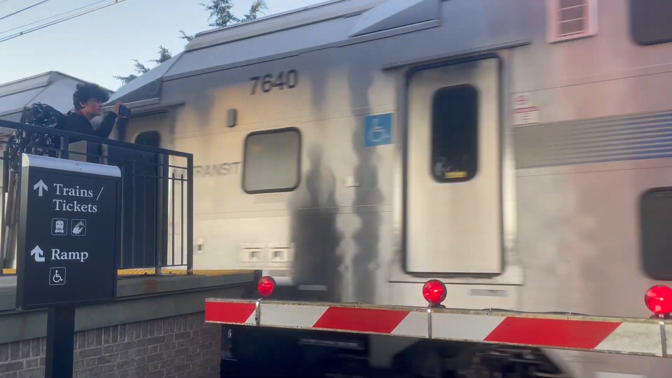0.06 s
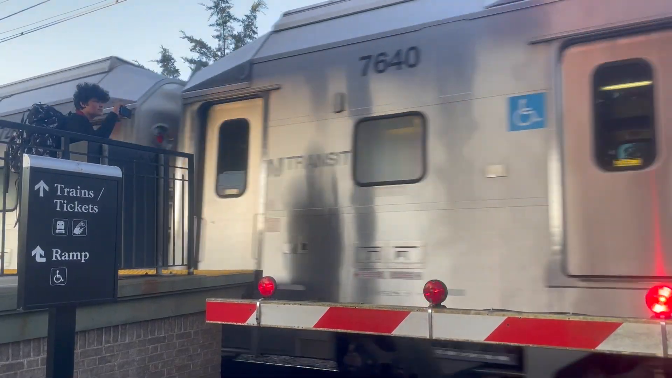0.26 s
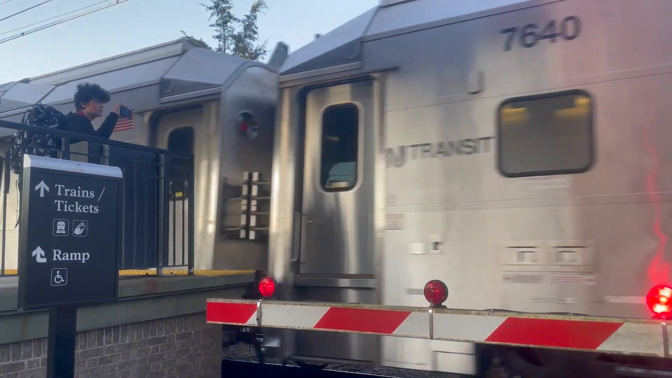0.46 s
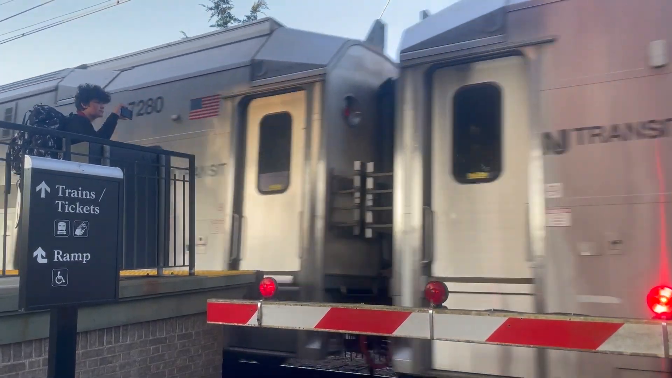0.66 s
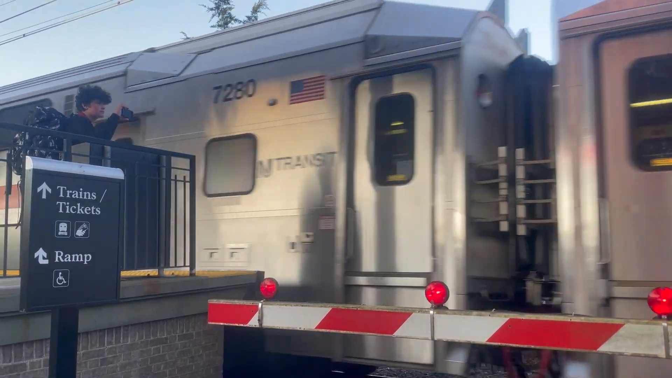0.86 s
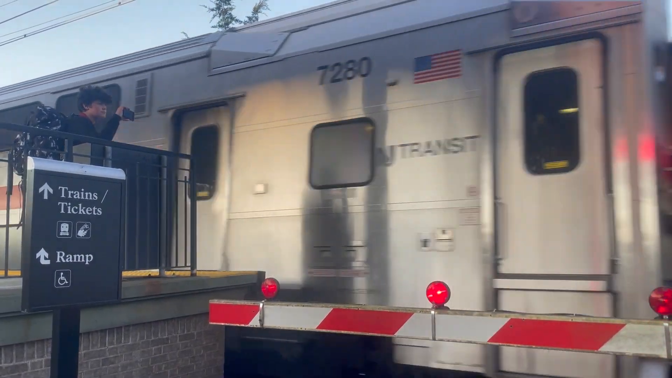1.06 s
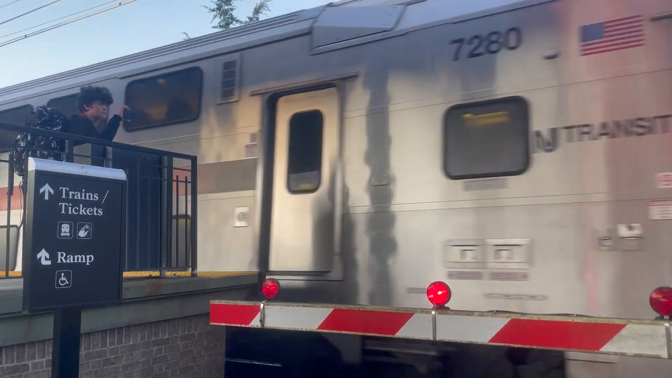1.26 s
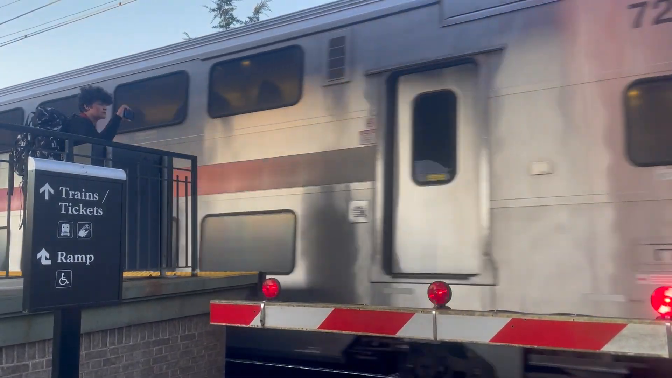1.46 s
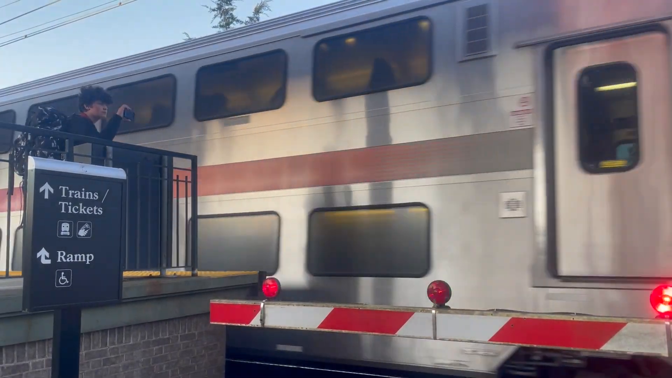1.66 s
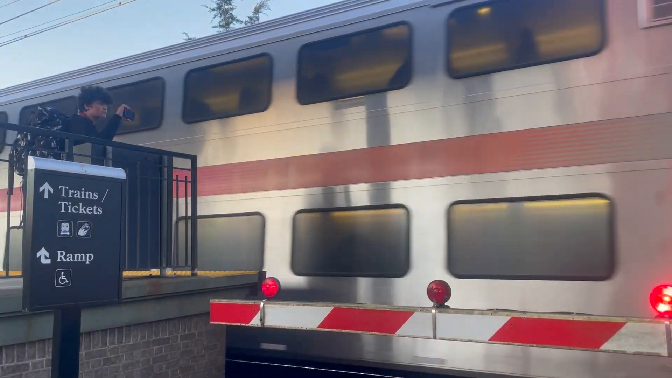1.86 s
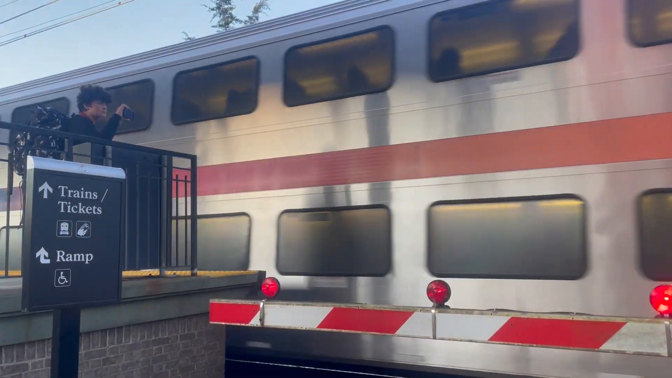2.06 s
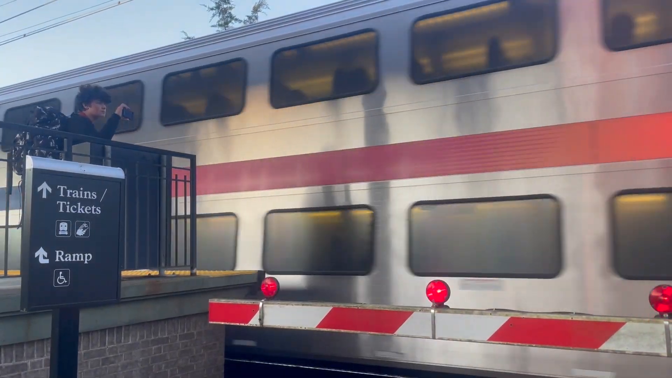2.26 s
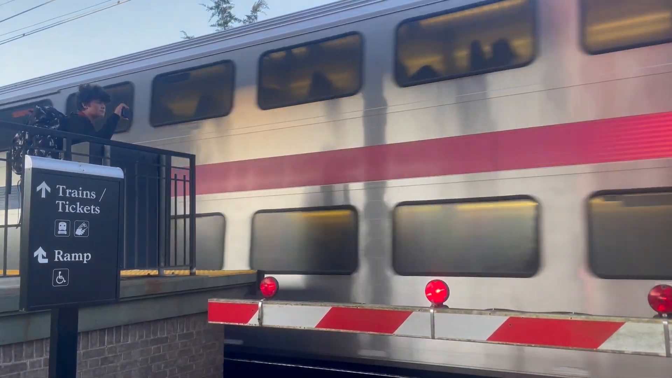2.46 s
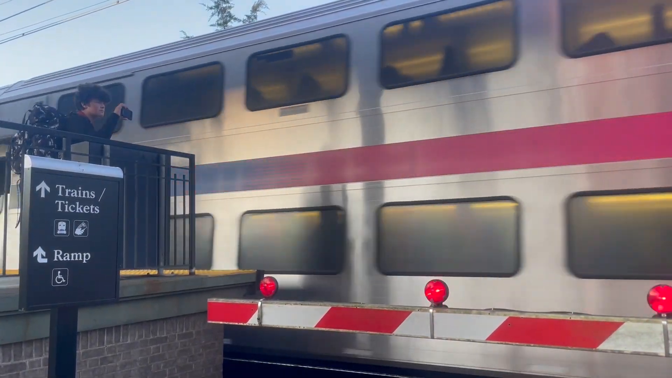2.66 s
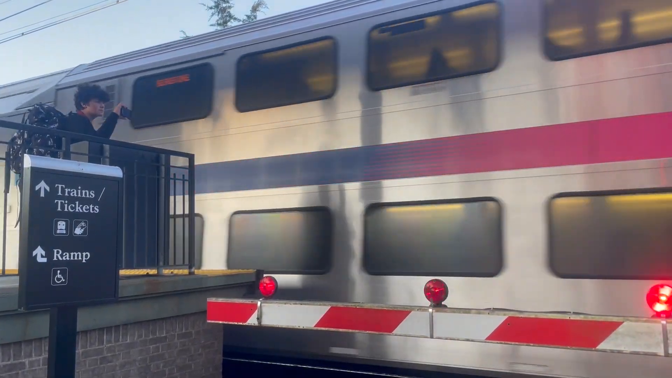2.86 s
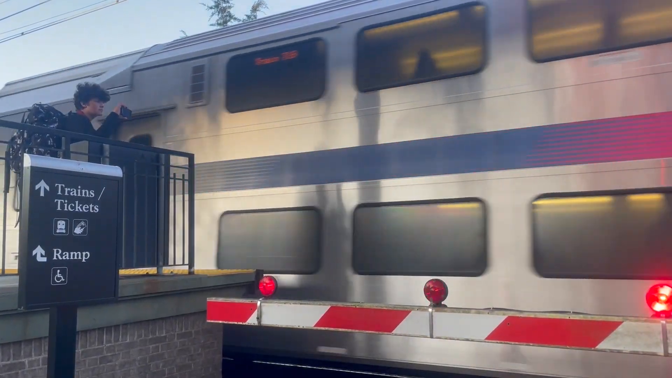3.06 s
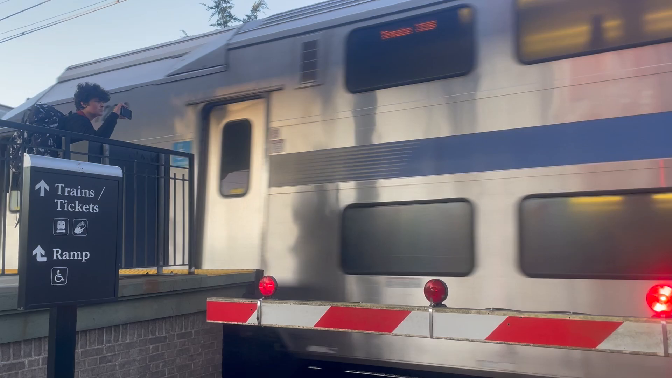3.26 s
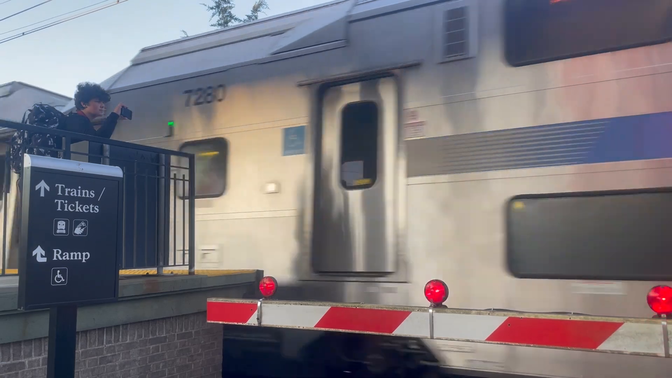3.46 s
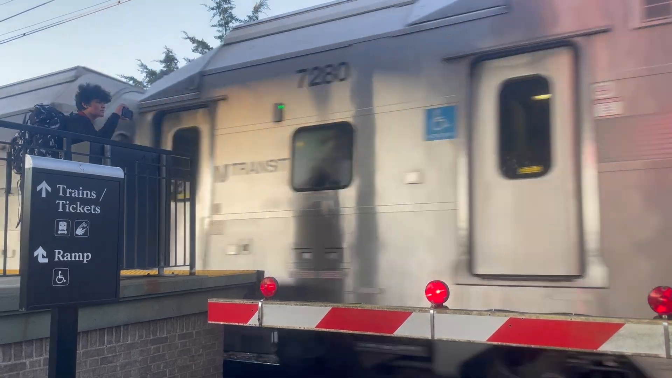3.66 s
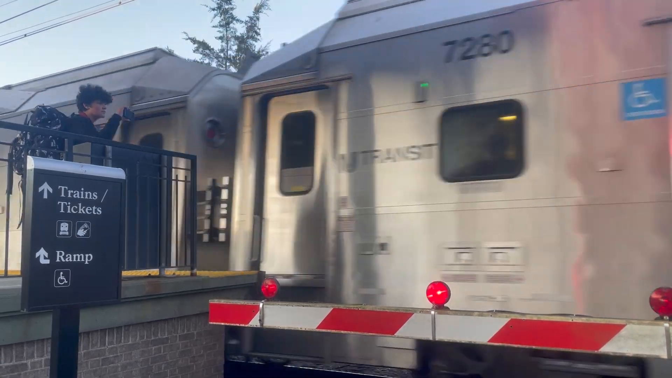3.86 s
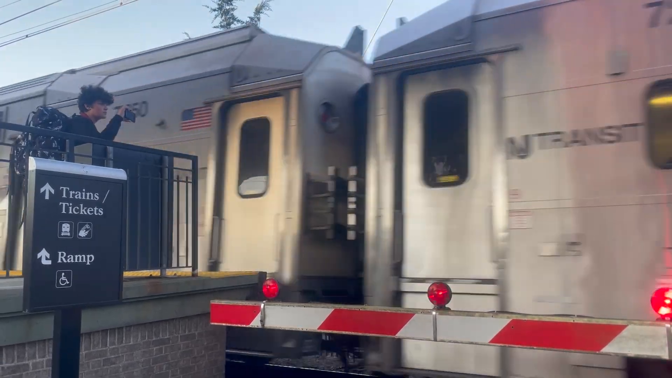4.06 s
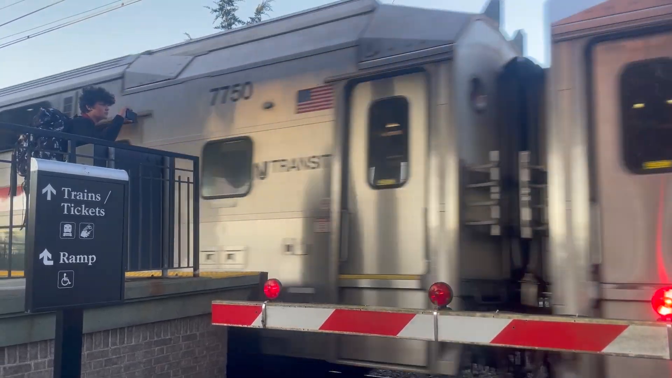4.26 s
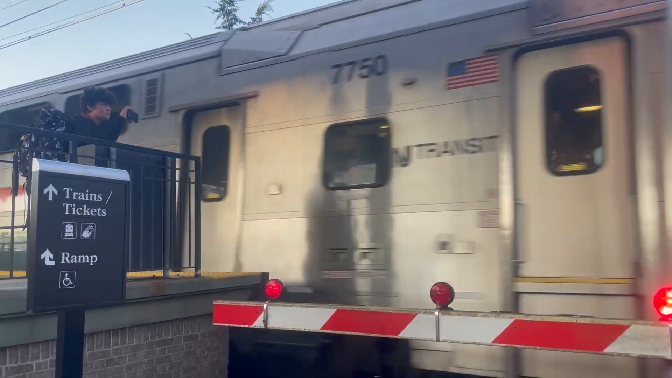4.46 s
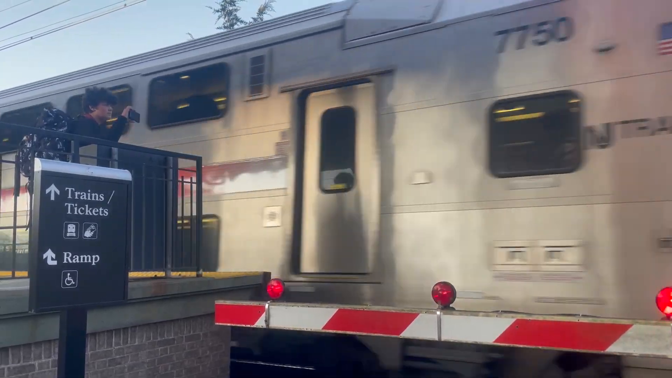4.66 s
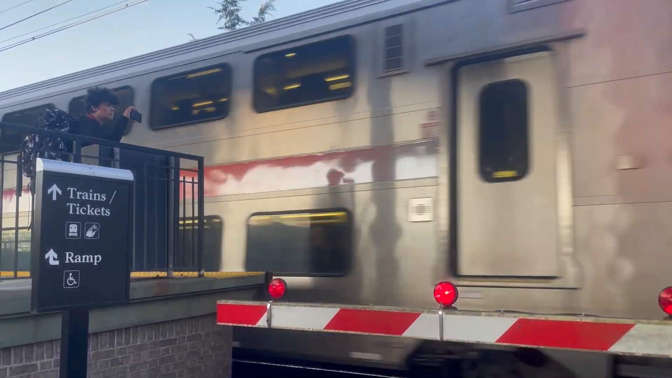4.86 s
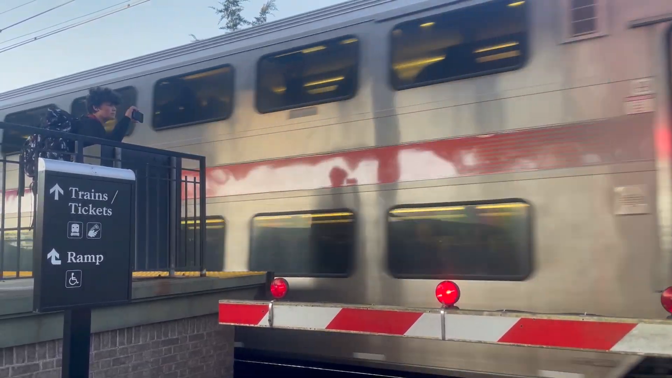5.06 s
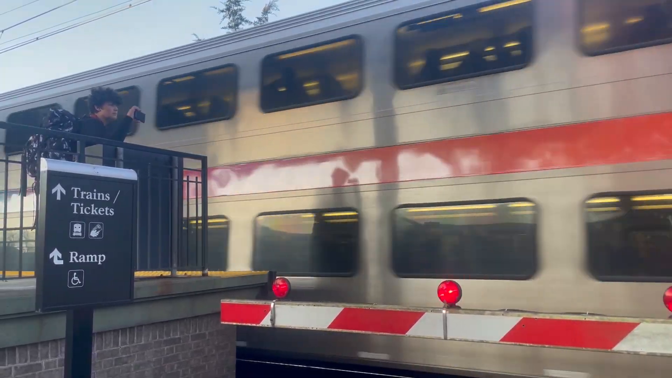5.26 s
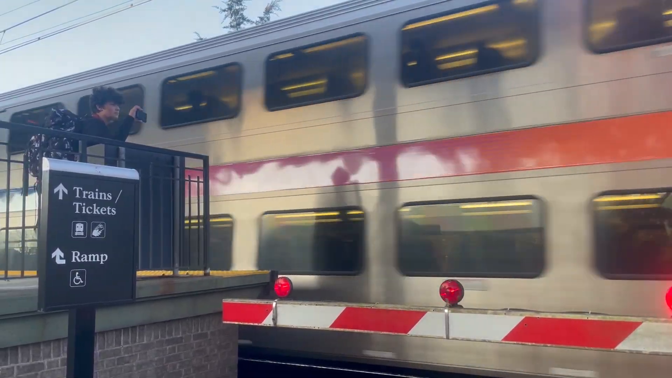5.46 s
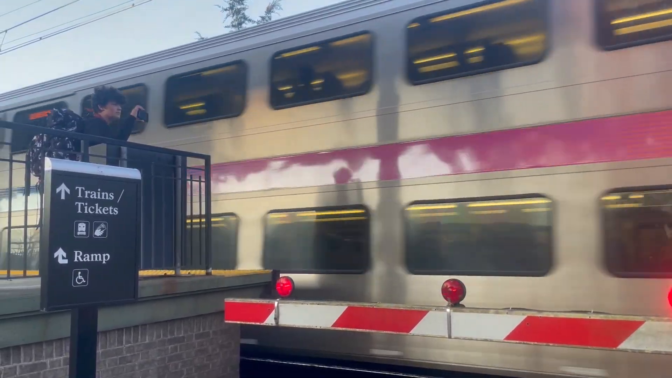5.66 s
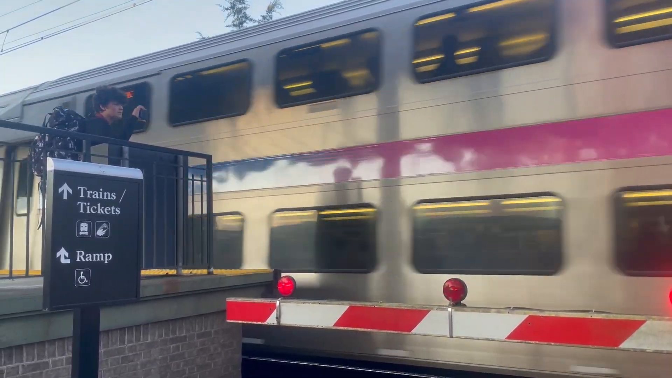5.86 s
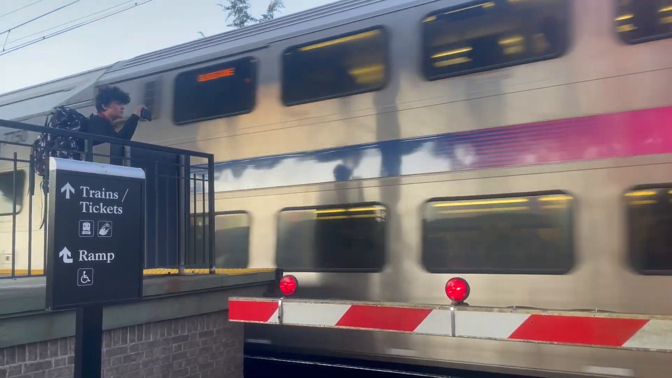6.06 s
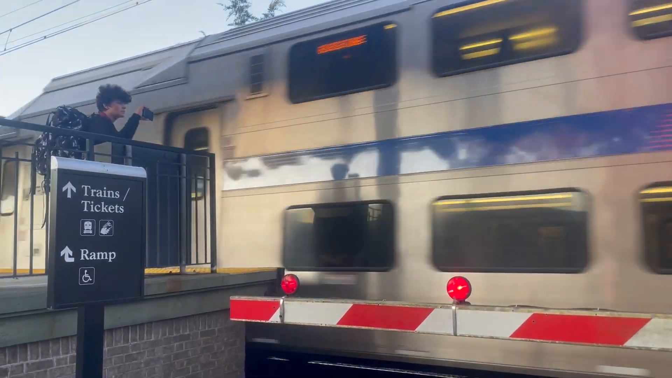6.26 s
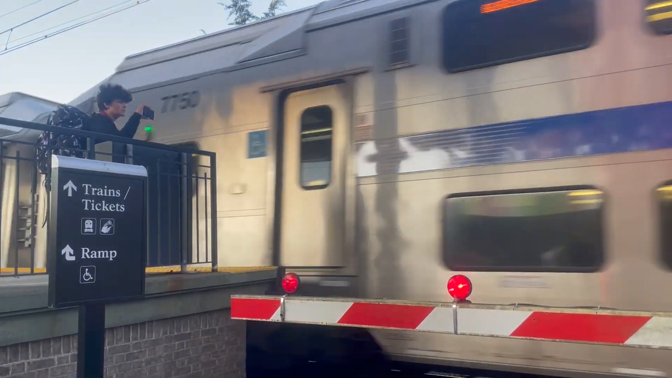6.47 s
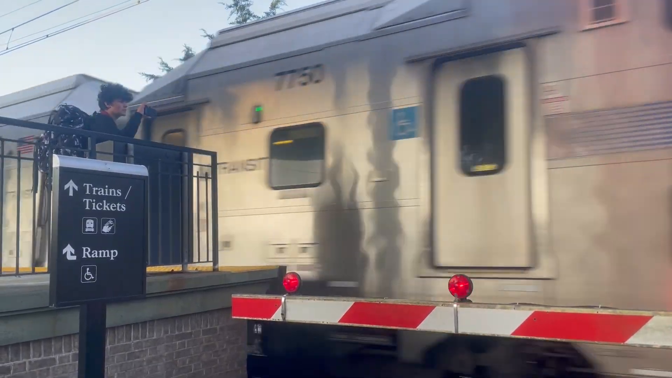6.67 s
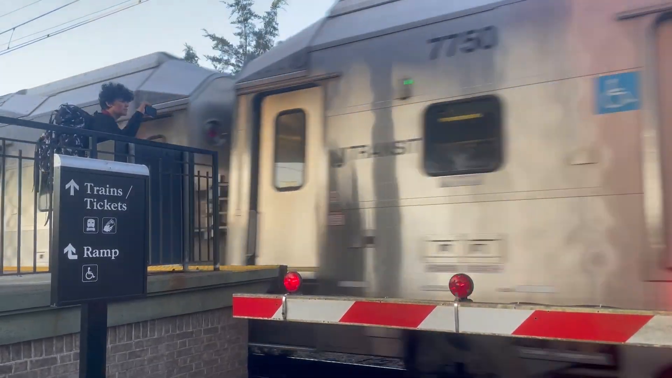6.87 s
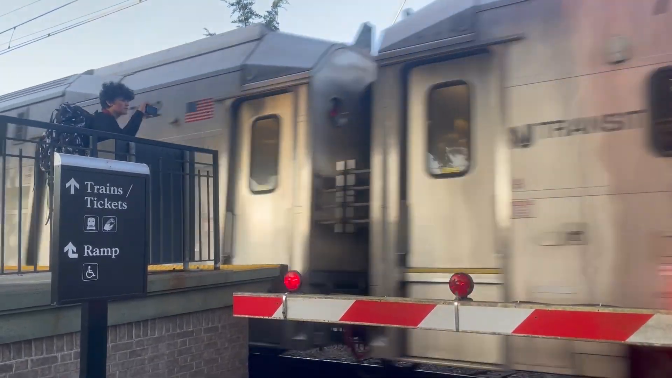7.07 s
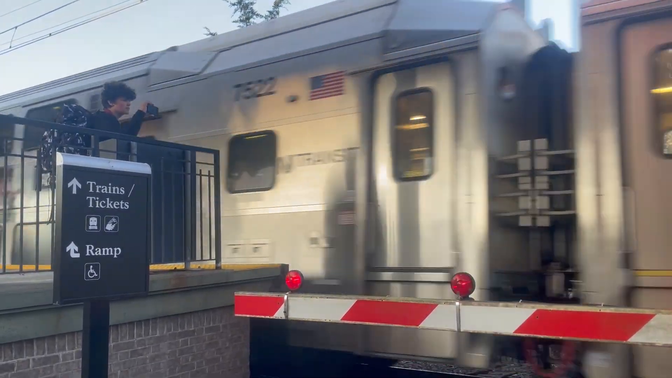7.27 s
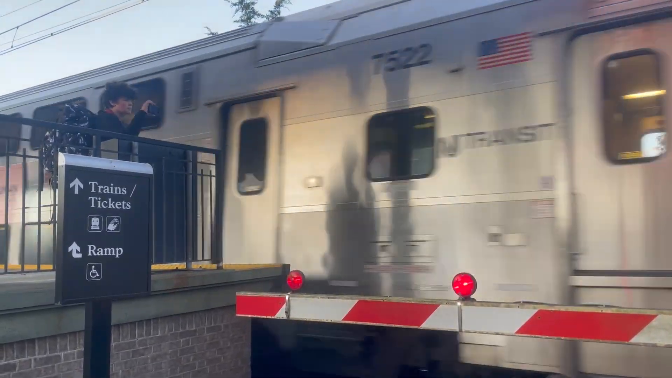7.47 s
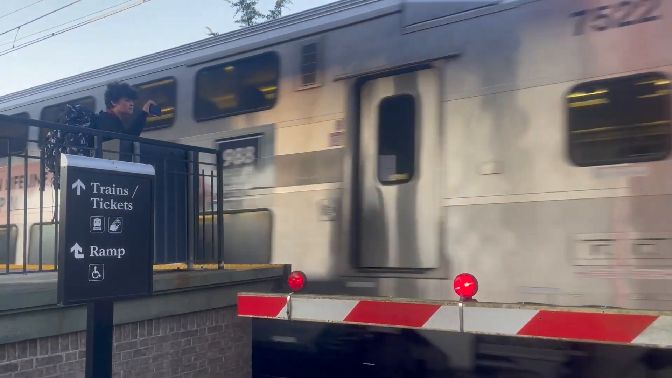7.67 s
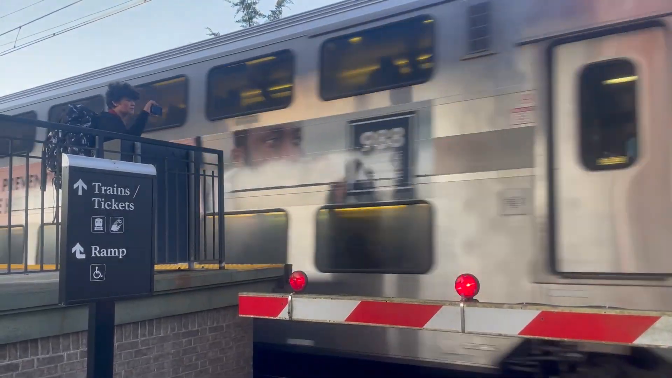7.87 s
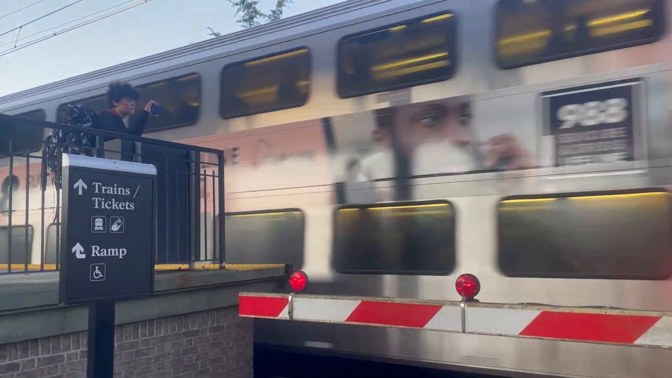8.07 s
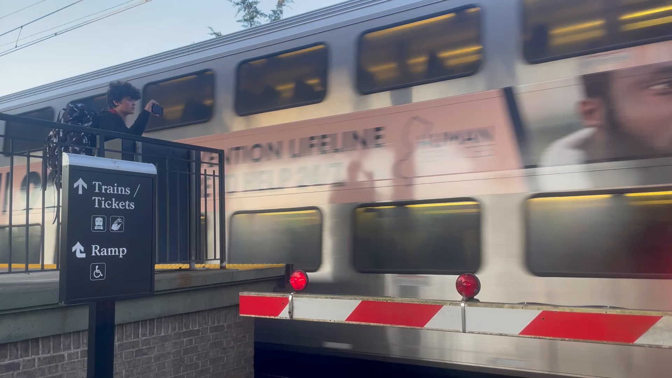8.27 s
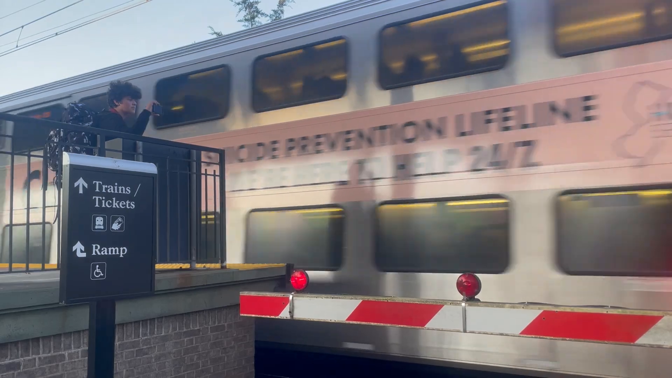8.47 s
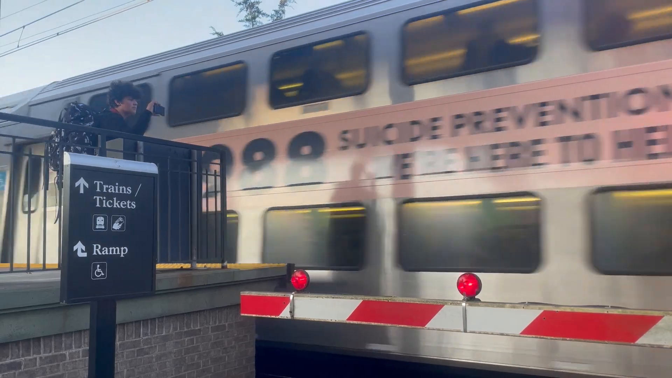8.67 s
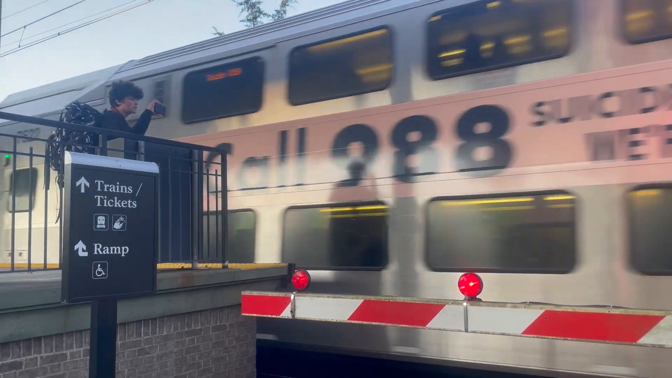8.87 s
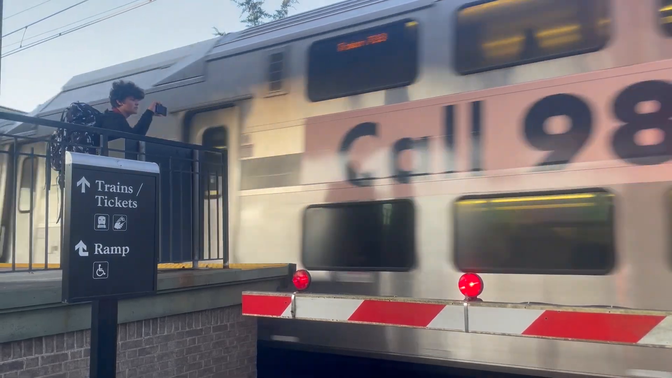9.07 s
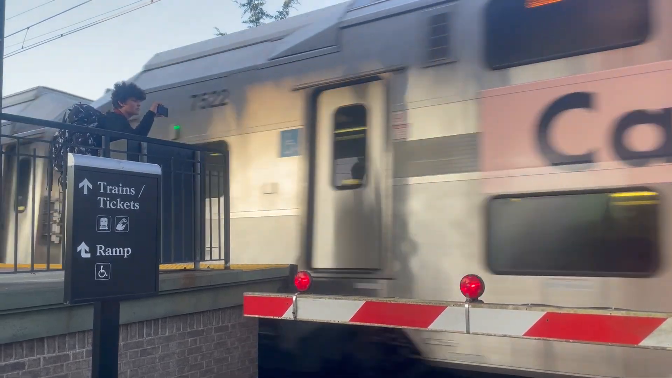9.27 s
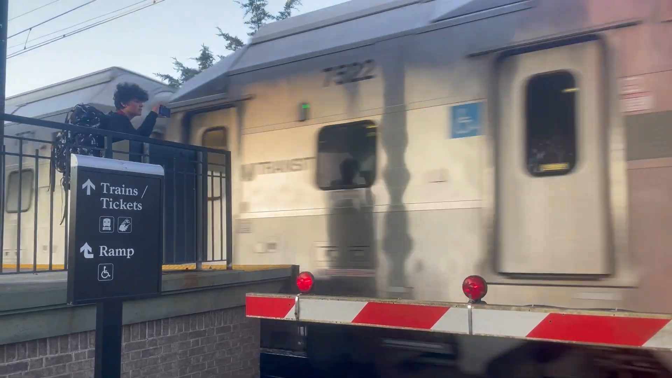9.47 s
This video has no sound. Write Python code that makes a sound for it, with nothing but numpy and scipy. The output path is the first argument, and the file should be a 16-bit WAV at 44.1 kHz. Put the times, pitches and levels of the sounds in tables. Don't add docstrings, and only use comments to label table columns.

```python
import sys
import numpy as np
from scipy import signal
from scipy.fft import rfft, irfft, next_fast_len
from scipy.io import wavfile
from scipy.ndimage import uniform_filter1d

SR = 44100
rng = np.random.default_rng(int(sys.argv[2]) if len(sys.argv) > 2 else 0)


def amplitude_ratio(level_db):
    exponent = np.asarray(level_db, float) / 20
    return 10 ** exponent


def waveform_to_disk(signal):
    frames = np.transpose(np.atleast_2d(signal))
    scaled = np.clip(frames, -1, 1) * 32767
    samples = np.round(scaled).astype(np.int16)
    wavfile.write(sys.argv[1], SR, samples)


N = 419391


def evened(x):
    return x / np.sqrt(np.mean(x ** 2) + 1e-20)


def read(points, hz):
    f, value = np.transpose(points)
    return np.interp(np.log(hz + 1), np.log(f + 1), value)


def add(mix, s, sound):
    part = mix[..., round(s * SR):][..., :sound.shape[-1]]
    part += sound[..., :part.shape[-1]]


def resonate(x, hz, width_hz):
    turn = np.exp(2j * np.pi * np.cumsum(hz * np.ones(x.shape[-1])) / SR)
    r = np.exp(-np.pi * width_hz / SR)
    return 2 * (turn * signal.lfilter([1 - r], [1, -r], x / turn)).real


def noise(layers, size, patchy_db, flicker_db, streaks_db):
    hop = size // 4
    frames, hz = N // hop + 5, np.fft.rfftfreq(size, 1 / SR)
    t, power = np.arange(frames) * hop / SR, 0
    for spectrum, s, level_db in layers:
        shape = amplitude_ratio(read(spectrum, hz)) ** 2
        power = power + np.outer(amplitude_ratio(np.interp(t, s, level_db)) ** 2, shape / shape.sum()).T
    a, b, c, d, patches, streaks = rng.standard_normal((frames, len(hz), 6)).T
    patches = uniform_filter1d(patches, size=5, axis=0)
    patches = evened(uniform_filter1d(patches, size=9, axis=1))
    streaks = np.maximum(evened(uniform_filter1d(streaks, size=70, axis=1)), 0)
    flicker = evened(uniform_filter1d(rng.standard_normal(frames), size=4))
    field_db = patchy_db * patches + flicker_db * flicker + streaks_db * streaks
    z = np.array([a + 1j * b, c + 1j * d]) * np.sqrt(power) * amplitude_ratio(field_db)
    return signal.istft(z, nperseg=size, noverlap=size - hop)[1][:, :N] * 1.167


# start_s, load_db (near bogies on the track), contact_db (wheels heard past the cars)
PASSING = [(0.0, -28, -43), (0.4, -26, -41.5), (1.08, -28, -44.5), (1.46, -27, -46.5), (1.96, -27.5, -47),
           (2.62, -38, -49.5), (3.1, -35.5, -46), (3.68, -27, -41), (3.86, -19, -40), (4.82, -22, -40),
           (6.06, -32.5, -45.5), (6.49, -31.5, -41), (6.99, -19, -37.5), (7.97, -19.5, -37.5),
           (8.32, -18.5, -43), (8.66, -30, -45.5), (9.11, -30, -43), (9.51, -27.5, -39.5)]


def follow(mean_db, load_share, contact_share):
    s, load_db, contact_db = np.transpose(PASSING)
    return s, mean_db + load_share * (load_db + 26) + contact_share * (contact_db + 43)


# pitch_hz, level_db (per Hz)
GROUND_RUMBLE = [(25, -45), (38, -30), (50, -32), (65, 4.5), (95, 0), (125, -10), (200, -49), (400, -90)]
CAR_DRONE = [(40, -70), (80, -43), (130, 5.5), (180, 4), (240, 2.5), (320, -5), (440, -7.5), (650, -65),
             (1200, -80)]
RAIL_ROAR = [(150, -57), (300, 1), (480, 2.5), (700, -4.5), (1000, -8.5), (1200, -9), (1500, -15),
             (2200, -43), (4000, -80)]
WHEEL_RUSH = [(600, -60), (1200, -10), (1550, -1), (1950, 7), (2350, -2.5), (2700, 2.5), (3300, -7.5),
              (4200, -6), (5000, -13), (5800, -11), (8500, -14), (12500, -24.5), (14000, -21), (16500, -41)]


def rolling():
    rumble = (GROUND_RUMBLE, *follow(-25, load_share=.4, contact_share=.041))
    drone = (CAR_DRONE, *follow(-25, load_share=.71, contact_share=.02))
    roar = (RAIL_ROAR, *follow(-35, load_share=.033, contact_share=.77))
    rush = (WHEEL_RUSH, *follow(-42.5, load_share=.15, contact_share=.92))
    low = noise([rumble, drone], size=2048, patchy_db=1.5, flicker_db=.3, streaks_db=1.1)
    return low + noise([roar, rush], size=1024, patchy_db=2, flicker_db=.5, streaks_db=3.5)


# start_s, end_s, pitch_hz
WHEEL_RINGS = [(0, .5, 1120), (1.15, 1.45, 1110), (3.2, 4.0, 1950), (6.2, 7.2, 1140), (6.25, 7.2, 1820),
               (6.3, 6.8, 2000), (6.6, 7.2, 2730), (6.3, 7.1, 3800), (6.2, 6.9, 4260), (6.3, 7.1, 4880),
               (6.7, 7.0, 5090), (7.6, 8.1, 1040), (7.58, 8.0, 2075), (7.55, 7.8, 2320), (7.96, 8.27, 2685),
               (7.5, 7.75, 7200), (8.9, 9.15, 5050), (9.1, 9.51, 2000), (9.1, 9.51, 1080)]
# width_hz, level_db
RING_TONES = [(50, -41.5), (40, -46), (90, -56), (50.3, -43), (45, -44), (70, -39), (66, -46), (77, -55),
              (55, -70), (88, -58), (46, -58), (30.2, -38.5), (27.7, -34), (36, -43), (30, -39.5),
              (200, -42), (160, -55), (80, -47), (50, -44)]


def rings():
    out = np.zeros((2, N))
    for (start, end, hz), (width_hz, db) in zip(WHEEL_RINGS, RING_TONES):
        rough = rng.standard_normal((2, round((end - start) * SR)))
        tone = evened(resonate(resonate(rough, hz, width_hz), hz, width_hz * 2.3))
        add(out, start, amplitude_ratio(db) * tone * signal.windows.tukey(tone.shape[1], .7))
    return out


# pitch_hz, level_db (per Hz)
FLANGE_HISS = [(3500, -16.5), (5000, -10), (6000, -4.5), (7000, 0), (8500, 1.5), (10000, -3),
               (11500, -13.5), (13500, -16.5), (15500, -19), (16500, -32)]
# start_s, hold_s, level_db, bright_db (above 11 kHz)
FLANGE_RUBS = [(0.864, 0.04, -37.5, -4), (.92, 0.35, -35, -2), (1.222, 0.12, -26.5, 1),
               (1.352, 0.27, -27.5, 1.5), (1.687, 0.057, -30, 0), (2.26, .03, -55, 0),
               (2.422, .35, -70, 25.5), (3.346, 0.21, -44, 0), (3.48, 0.26, -46.5, -6),
               (4.323, .05, -41.5, -10), (4.634, 0.037, -27, 0), (4.66, .04, -29, 8), (4.747, 0.32, -36, 9),
               (5.03, .04, -33, 2), (5.1, 0.094, -45, 12), (7.295, .04, -37, 7), (7.378, 0.16, -38.5, 4),
               (7.57, 0.34, -34.5, 5), (8.16, .06, -41.5, -5), (8.38, 0.18, -52, 0), (8.6, 0.16, -54, 15),
               (9.1, 0.42, -53, 9)]


def flange():
    scuffs = [(row[0] + .017, .066, row[1] - 43, -3) for row in NEAR_JOINTS + FAR_JOINTS]
    start, hold, rub_db, bright_db = np.transpose(FLANGE_RUBS + scuffs)[..., None]
    rise_db_per_s, sag_db_per_s, fall_db_per_s = 265, 7, 168
    s = np.arange(0, N / SR, .002)
    rub_db = rub_db - rise_db_per_s * np.maximum(start - s, 0)
    rub_db = rub_db - sag_db_per_s * np.clip(s - start, 0, hold)
    rub_db = rub_db - fall_db_per_s * np.maximum(s - start - hold, 0)
    floor_db = np.interp(s, *follow(-55, load_share=.05, contact_share=.41))
    hiss_db = 10 * np.log10((amplitude_ratio(rub_db) ** 2).sum(0) + amplitude_ratio(floor_db) ** 2)
    top_db = 10 * np.log10((amplitude_ratio(rub_db + bright_db) ** 2).sum(0) + amplitude_ratio(floor_db + 1) ** 2)
    body = (FLANGE_HISS[:7] + [(13000, -50)], s, hiss_db)
    top = ([(10500, -30)] + FLANGE_HISS[6:], s, top_db - 15.5)
    return noise([body, top], size=512, patchy_db=1.5, flicker_db=2.2, streaks_db=2.5)


# pitch_hz, level_db, t60_s
TRACK_MODES = [(178, 0, .11), (243, 1, .12), (315, -7, .07), (385, -11, .06), (520, -14, .06)]
# pitch_hz, level_db, t60_s
RAIL_END_MODES = [(560, -5, .045), (700, -3, .05), (810, 2, .06), (980, -6, .02), (1900, -16, .04),
                  (2650, -15, .05)]
# pitch_hz, level_db (per Hz)
LOOSE_STEEL = [(300, 16.5), (600, 9), (1000, 8), (1400, -3.5), (1900, 3.5), (2700, 2), (3500, -4.5),
               (5000, -2.5), (8500, -9), (12000, -45), (15000, -60)]


def joint(blow_db, upper_db, clatter_db, crack_db, bounce_s):
    t = np.arange(round(.3 * SR)) / SR
    bounce = .043 * rng.standard_normal(len(t)) * np.exp(-(t / bounce_s) ** 3)
    bounce[100] = .56
    modes = sum(amplitude_ratio(db + upper_db * (k > 0) - 60 * t / t60) * np.sin(2 * np.pi * hz * rng.uniform(.97, 1.03) * t)
                for k, (hz, db, t60) in enumerate(TRACK_MODES))
    ring = signal.fftconvolve(bounce, modes)[:len(t)]
    crack = sum(amplitude_ratio(db - 60 * t / t60) * np.sin(2 * np.pi * hz * rng.uniform(.95, 1.03) * t)
                for hz, db, t60 in RAIL_END_MODES)
    colour = amplitude_ratio(read(LOOSE_STEEL, np.fft.rfftfreq(len(t), 1 / SR)))
    loose = evened(irfft(rfft(rng.standard_normal(len(t))) * colour, len(t)))
    swell = (1 - np.exp(-t / .0069)) * np.exp(-(t / .1) ** 2)
    blow = 1.126 * ring / abs(ring).max()
    return amplitude_ratio(blow_db) * (blow + amplitude_ratio(clatter_db) * loose * swell + amplitude_ratio(crack_db) * crack)


# start_s, blow_db, upper_db (upper track modes)
FAR_JOINTS = [(0.277, -26, -2), (0.66, -33, -18), (2.339, -15.5, -14), (3.655, -10.5, 9), (4.58, -8, -13),
              (4.915, -2, 3.5), (5.413, -14, 1), (5.505, -9.5, -19), (5.565, -10, -14), (6.832, -11.5, -13),
              (7.02, -1, -1), (7.165, -12, 14), (7.52, -6, -13), (7.857, -1, 5), (8.284, -19, 4),
              (8.387, -9, -17), (8.445, -9, -11), (9.472, -12, 15)]


def far_joints(mix):
    for s, blow_db, upper_db in FAR_JOINTS:
        thud = joint(blow_db, upper_db, clatter_db=-24.5, crack_db=-40, bounce_s=.06)
        front = 1 - np.exp(-(np.arange(len(thud)) / (.014 * SR)) ** 2)
        add(mix, s - .008, thud * front)


# start_s, blow_db, upper_db (upper track modes), crack_db (relative to the blow)
NEAR_JOINTS = [(0.501, -5, 14, -19.5), (0.872, -8, 8, -29), (1.598, -7, 4, -26), (1.803, -21, -5, -25),
               (1.952, -6, -8, -19), (2.15, -22.5, -17, -28), (3.972, -2.5, 22, -13.5),
               (4.291, -1, 0.5, -21), (5.126, -18, -5, -24), (5.228, -1.5, 3, -14),
               (7.293, 0.5, 3.5, -16.5), (8.047, -41, 30, 3), (8.129, -1, 3, -17.5)]


def near_joints(mix):
    for s, blow_db, upper_db, crack_db in NEAR_JOINTS:
        add(mix, s - .002, joint(blow_db, upper_db, -22, crack_db, bounce_s=.057))


OVERTONES_DB = [0, 1, -3]
# pitch_hz, level_db
WHEEL_VOICE = [(3800, 0), (5500, 0), (7700, -6), (8800, 3), (10500, -4), (13000, -17), (16000, -13)]


def squeal(length, first_hz, last_hz, peak_db):
    t = np.arange(0, length, 1 / SR)
    u, span_hz = t / length, abs(last_hz - first_hz)
    rough = .5 + span_hz / length / 10000
    swell = .09 if span_hz > 500 else .36
    glide_share = .3 if last_hz > first_hz else .72
    glide = np.sin(np.pi / 2 * np.minimum(u / glide_share, 1)) ** 2
    chance = rng.standard_normal((3, SR // 2))[:, :len(t)]
    shake, stutter = (evened(uniform_filter1d(v, size=50)) for v in chance[:2])
    wander = evened(uniform_filter1d(chance[2], size=350))
    hz = first_hz + (last_hz - first_hz) * glide
    turns = np.cumsum(hz * (1 + rough * (.016 * shake + .011 * wander))) / SR
    whistle = sum(amplitude_ratio(db + read(WHEEL_VOICE, (k + 1) * hz)) * np.sin(2 * np.pi * (k + 1) * turns)
                  for k, db in enumerate(OVERTONES_DB))
    halo = evened(resonate(resonate(chance[0], hz, 450), hz, 450))
    whistle = whistle + rough * amplitude_ratio(-7) * halo
    level_db = peak_db - 12 * np.maximum(1 - u / swell, 0) - 19 * u ** 3
    level_db = level_db - 3 * (max(first_hz, last_hz) - hz) / 1000
    level_db = level_db + 1.8 * stutter + 1.86 * wander
    return 1.09 * amplitude_ratio(level_db) * whistle * signal.windows.tukey(len(t), .1)


# start_s, length_s, first_hz, last_hz, level_db
SQUEALS = [
    (.882, .115, 3950, 3920, -27.5),
    (1.325, .275, 5280, 4130, -23.5),
    (1.635, .12, 4150, 5150, -30.5),
    (3.355, .2, 5200, 5120, -36),
    (4.664, .105, 5280, 4380, -25.5),
    (4.98, .115, 4350, 5080, -25.5),
    (7.375, .125, 4620, 4830, -37),
]


def squeals(mix):
    for start, *shape in SQUEALS:
        add(mix, start, squeal(*shape))


def scattered(x):
    t = np.arange(0, 1500, 20)
    taps = np.zeros(1520)
    taps[t + rng.integers(0, 20, len(t))] = rng.choice([-1., 1.], len(t)) * amplitude_ratio(-60 * t / SR / .027)
    taps[:40] = 0
    taps[0] = .49
    return np.array([x, signal.oaconvolve(x, taps / np.linalg.norm(taps))[:N]])


def scene():
    near = np.zeros(N)
    far_joints(near)
    near_joints(near)
    squeals(near)
    return scattered(near) + rolling() + rings() + flange()


# pitch_hz, level_db (a bin)
FAINTEST_KEPT = [(2000, -120), (11000, -102), (13000, -99), (14000, -81.5), (15700, -75), (16000, -50)]


def thinned(ports):
    pair = np.array([ports[0] + ports[1], ports[0] - ports[1]]) / 2
    hz, _, z = signal.stft(pair, SR, "cosine", 2048, 1024)
    bands = z[:, :1024].reshape(2, 128, 8, -1)
    band_db = 10 * np.log10(uniform_filter1d((abs(bands) ** 2).mean(2), size=3) + 1e-16)
    centre = hz[4:1024:8, None]
    roar_db = uniform_filter1d(band_db[0, :2].max(0), size=9) + 40
    luck = rng.standard_normal(band_db.shape)
    sway_db = 3.2 * (luck + 1.5 * evened(uniform_filter1d(luck[0, 0], size=3)))
    faint = band_db < read(FAINTEST_KEPT, centre) + .7 * roar_db + sway_db
    under_db = 7 - 3.5 * (centre > 9500) - 1.5 * (centre > 11500)
    lopsided = (band_db < band_db[::-1] - under_db + luck) & (centre > 7000)
    below_db = np.array([29, 22])[:, None, None]
    squeal_db = band_db[:, 20:].max((0, 1)) - below_db + 3.5 * luck
    masked = (band_db < squeal_db) & (centre > 2200) & (centre < 6000)
    z[:, :1024] = (bands * ~(faint | lopsided | masked)[:, :, None]).reshape(2, 1024, -1)
    mid, side = signal.istft(z, SR, "cosine", 2048, 1024)[1][:, :N]
    return np.array([mid + side, mid - side])


def roll_off(x):
    return signal.sosfilt(signal.butter(12, 16750, fs=SR, output="sos"), x)


# pitch_hz, likeness (0-1)
PORT_LIKENESS = [(60, 0.99), (300, 0.83), (700, 0.33), (1800, 0.028), (2900, 0.8), (3500, 0.49),
                 (4800, 0.73), (5500, 0.78), (6800, 0.96), (8000, 0.93), (16000, 0.48)]
# pitch_hz, level_db (left minus right)
PORT_LEAN = [(100, -2.5), (800, -2.5), (1200, 0.5), (1900, 5), (2300, -1.5), (2700, 5), (3300, -1.5),
             (5200, 3.5), (6100, -5), (7000, -3), (8500, 1), (16000, -4)]
# pitch_hz, phase_turns
PORT_TURNS = [(0, .03), (1100, .05), (2300, -.45), (3000, 0), (4000, -.13), (5000, -.08), (5700, -.4),
              (6600, -.15), (7400, -.22), (8600, -.5), (10700, -1), (12800, -1.5), (14900, -2),
              (17000, -2.1)]


def record(dry):
    size = next_fast_len(N)
    hz = np.fft.rfftfreq(size, 1 / SR)
    direct, unlike = rfft(dry, size) * hz ** 2 / (hz ** 2 + 31 ** 2)
    like, lean = np.clip(read(PORT_LIKENESS, hz), 0, 1), amplitude_ratio(read(PORT_LEAN, hz) / 2)
    turn = np.exp(2j * np.pi * np.interp(hz, *np.transpose(PORT_TURNS)))
    left = direct * lean
    right = (like * direct * turn + np.sqrt(1 - like ** 2) * unlike) / lean
    ports = irfft([left, right], size)[:, :N]
    mix = thinned(1.05 * np.tanh(ports / 1.05))
    return roll_off(mix)


dry = scene()
out = record(dry)
waveform_to_disk(out)
```